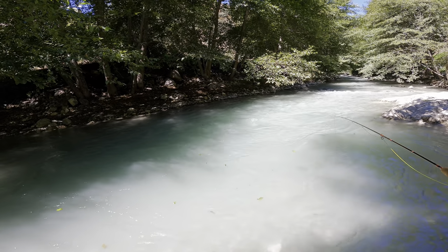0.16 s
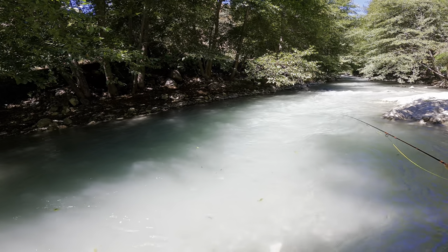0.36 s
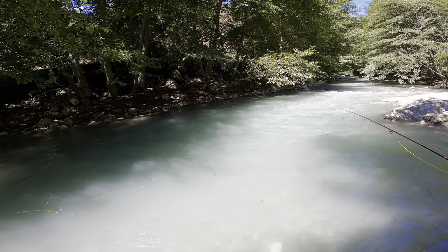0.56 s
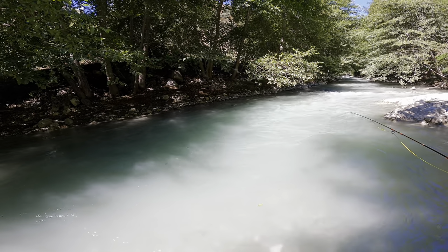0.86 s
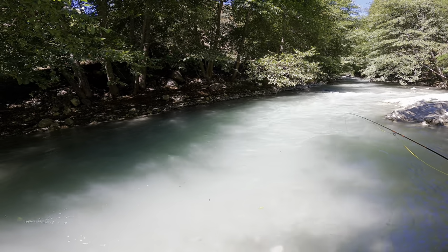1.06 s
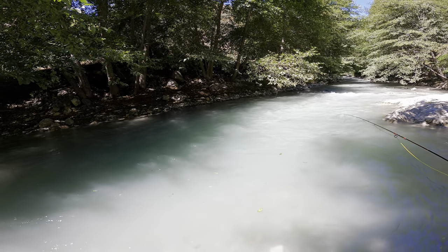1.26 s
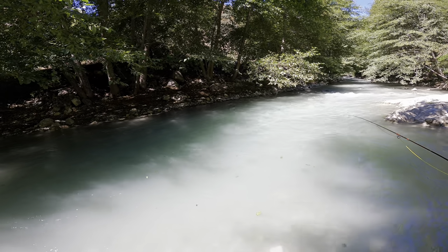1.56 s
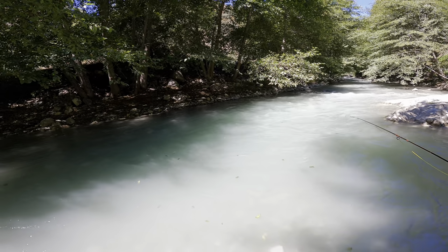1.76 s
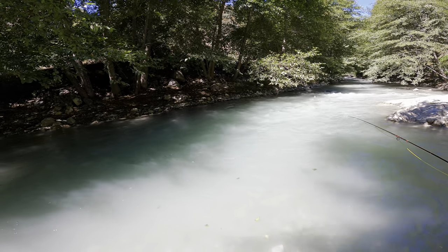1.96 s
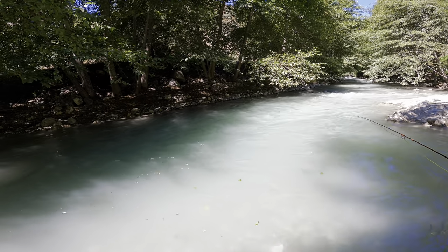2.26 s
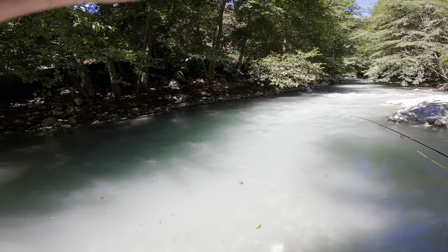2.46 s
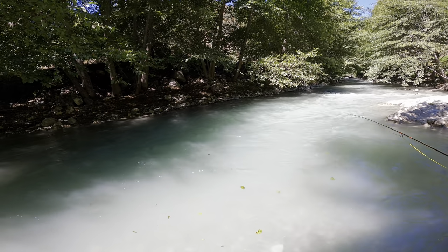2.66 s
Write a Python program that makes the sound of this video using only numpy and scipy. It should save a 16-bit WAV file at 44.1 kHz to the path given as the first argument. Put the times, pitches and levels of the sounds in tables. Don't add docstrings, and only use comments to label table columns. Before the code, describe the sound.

A fast river roars steadily past its bank, fine spray hissing above, while low bubbles gulp and glug close to a small outdoor microphone touched by faint wind rumble.

```python
import sys
import numpy as np
from scipy import signal
from scipy.fft import rfft, irfft, next_fast_len
from scipy.io import wavfile
from scipy.ndimage import uniform_filter1d, map_coordinates

SR = 44100
rng = np.random.default_rng(int(sys.argv[2]) if len(sys.argv) > 2 else 0)


def nominal_scale(level):
    x = np.asarray(level, float) / 20
    return 10 ** x


def int16_out(signal):
    q = np.round(np.clip(np.atleast_2d(signal).T, -1, 1) * 32767)
    wavfile.write(sys.argv[1], SR, q.astype(np.int16))


N = 123479
NOW = np.arange(N) / SR


def unit(x):
    return x / np.sqrt(np.mean(x ** 2) + 1e-20)


def filtered(x, response):
    m = next_fast_len(N + 8192)
    hz = np.fft.rfftfreq(m, 1 / SR)
    return irfft(rfft(x, m) * response(hz), m)[:N]


def rush(spectrum, patchy_db, span):
    f, db = np.transpose(spectrum)
    z = signal.stft(rng.standard_normal(N + 512), nperseg=512)[2]
    patches = uniform_filter1d(rng.standard_normal(z.shape), size=span, axis=0)
    patches = uniform_filter1d(patches, size=12, axis=1)
    noise = signal.istft(z * nominal_scale(patchy_db * unit(patches)), nperseg=512)[1][:N]
    return unit(filtered(noise, lambda hz: nominal_scale(np.interp(np.log(hz + 1), np.log(f + 1), db))))


RISE = 0.048


def bubbles(s, hz, db, cycles, size):
    t = np.arange(size) / SR
    life = t * hz[:, None] / cycles
    swell = np.e * 3 * life * np.exp(-3 * life)
    tone = np.sin(2 * np.pi * cycles * life * (1 + RISE * life / 2))
    wave = nominal_scale(db)[:, None] * swell * tone
    wave = wave * np.clip(4 - 4 * t / t[-1], 0, 1)
    at = np.round(s * SR).astype(int)[:, None] + np.arange(size)
    at = np.where((at < 0) | (at > N), N, at)
    return np.bincount(at.ravel(), wave.ravel(), N + 1)[:N]


def swarm(per_s, centre_hz, spread, cycles, sizes_db, size):
    count = round(per_s * N / SR)
    r = rng.random((count, 2))
    hz = np.clip(centre_hz * np.exp(spread * rng.standard_normal(count)), 60, SR / 3)
    db = -sizes_db * np.log(1 - r[:, 1])
    return unit(bubbles(r[:, 0] * N / SR, hz, db, cycles, size=size))


# f/Hz, level/dB (per Hz)
ROAR_COLOUR = [(25, -54), (70, -36), (130, -5.5), (190, 1.5), (330, 0.5), (520, -1.5), (620, -7),
               (850, -7.5)]
# f/Hz, level/dB (per Hz)
CHURN_COLOUR = [(500, -25), (850, 3), (1100, -7.5), (1600, -2), (2200, -15.5), (3200, -55)]


def roar(bright_db):
    crowd = swarm(1500, centre_hz=419.9, spread=0.4354, cycles=7.64, sizes_db=0.88, size=1100)
    water = rush(ROAR_COLOUR, patchy_db=-0.1, span=3) + nominal_scale(-11) * crowd
    end_hz, pivot_hz = 1049, 402
    water = unit(filtered(water, lambda hz: 1 / np.sqrt(1 + (hz / end_hz) ** 8)))
    upper = filtered(water, lambda hz: 1 / (1 + (pivot_hz / (hz + 1)) ** 8))
    lower = water - upper
    water = nominal_scale(bright_db / 2) * upper + nominal_scale(-bright_db / 2) * lower
    return water + nominal_scale(-13) * rush(CHURN_COLOUR, patchy_db=.5, span=5)


# f/Hz, level/dB (per Hz)
SPRAY_COLOUR = [(900, -16), (2000, -6.5), (3800, -11), (5600, -16), (7300, -20.5), (11600, -37),
                (13900, -47), (15700, -49)]


def spray():
    drops = swarm(2500, centre_hz=4140, spread=0.414, cycles=1.15, sizes_db=1.4, size=200)
    air_hz = 6450
    drops = filtered(drops, lambda hz: 1 / (1 + (hz / air_hz) ** 8))
    return unit(rush(SPRAY_COLOUR, patchy_db=0.12, span=9) + nominal_scale(-15) * drops)


# t/s, roar level/dB, roar brightness/dB, spray level/dB (over its mean)
RIVER_FLOW = [(0, -32, 2.5, -0.5), (.2, -32.5, 3, 0.5), (.45, -32.5, 4, 0), (.54, -32, 0, 0),
              (.7, -33.5, 6.5, 0.5), (.95, -32, 2, 0), (1.07, -31.5, 0.5, 0), (1.19, -32.5, 1.5, -0.5),
              (1.27, -32.5, 4, 0), (1.4, -32, 2, 0.5), (1.7, -32, 2, 0), (1.85, -32, -0.5, 0),
              (2.02, -31.5, 3, 0), (2.2, -32.5, 1.5, -0.5), (2.36, -33, 5, -0.5), (2.47, -32.5, 4.5, -0.5),
              (2.68, -31.5, 2.5, -0.5), (2.8, -34, 6.5, 0)]


def river():
    s, *controls = np.transpose(RIVER_FLOW)
    roar_db, bright_db, spray_db = [np.interp(NOW, s, c) for c in controls]
    spray_mean_db = -46
    return nominal_scale(roar_db) * roar(bright_db) + nominal_scale(spray_mean_db + spray_db) * spray()


def ringing(rows, life_s, db_over, size):
    s, db, hz = np.transpose(rows)
    cycles = (hz * life_s)[:, None]
    return bubbles(s - life_s / 3, hz / (1 + RISE / 3), db + db_over, cycles, size=size)


# t/s (of the peak), level/dB, f/Hz
GULP_BUBBLES = [(0.186, -34, 218), (0.192, -34, 709), (0.292, -37, 810), (0.45, -36, 796),
                (0.479, -35, 748), (0.508, -33, 280), (0.531, -31, 296), (0.551, -32.0, 359),
                (0.566, -33, 243.4), (0.607, -35.5, 734), (0.663, -31.0, 392), (0.675, -31.8, 508),
                (0.726, -31.5, 198), (0.833, -31.9, 316), (0.834, -30, 218), (1.051, -29, 377),
                (1.072, -29.5, 201), (1.106, -33, 767), (1.125, -32, 827), (1.26, -28.5, 398),
                (1.283, -32, 182), (1.358, -32, 172), (1.418, -35, 200), (1.563, -37.0, 694),
                (1.576, -33.5, 469), (1.607, -29, 376), (1.644, -36, 700), (1.672, -29.5, 498),
                (1.691, -33, 375), (1.715, -34, 193), (1.737, -32, 373), (1.797, -33.5, 208),
                (1.865, -33.5, 479), (2.033, -31, 558), (2.051, -36, 678), (2.113, -39, 746),
                (2.223, -30, 332), (2.283, -31.7, 319), (2.374, -31, 258), (2.432, -37.5, 177),
                (2.474, -29, 509.5), (2.506, -30.2, 502), (2.599, -31, 550), (2.66, -29, 541),
                (2.788, -32, 544)]


def gulps():
    return ringing(GULP_BUBBLES, life_s=0.03396, db_over=-1.5, size=4000)


# t/s (of the peak), level/dB, f/Hz
RIPPLE_BUBBLES = [(0.367, -46, 2035), (0.432, -45.5, 2207), (0.441, -43, 1852), (0.692, -49, 2143),
                  (0.711, -48.1, 2471), (0.739, -44, 1545), (0.981, -42.5, 1206), (1.447, -40, 1459),
                  (1.501, -41, 1098), (1.608, -41.1, 1254), (1.705, -41, 1459), (1.717, -42, 1319),
                  (1.72, -46, 1550), (2.0, -44, 1464), (2.016, -44, 2089), (2.029, -42, 1168),
                  (2.596, -47.1, 2083), (2.762, -51, 2369), (2.762, -44, 1960), (2.766, -42, 1147)]


def ripples():
    return ringing(RIPPLE_BUBBLES, life_s=.014, db_over=0, size=1800)


# t/s, peak level/dB, f/Hz
GLUG_BUBBLES = [
    (0, -24, 600),
    (.526, -19.5, 812),
    (1.12, -33, 800),
]


def glugs():
    s, db, hz = np.transpose(GLUG_BUBBLES)
    return bubbles(s - .002, hz, db - 2.5, cycles=9, size=1500)


# t/s, length/s, f/Hz (of the bubbles), level/dB
FOLDING_WAVES = [(0.13, .06, 352, -42.5), (1.66, .14, 416, -45), (2.47, .08, 500, -41),
                 (2.3, 0.098, 520, -40.5), (1.55, 0.0812, 139, -45.5), (1.7, 0.073, 141, -47),
                 (0.43, .06, 403, -41), (.66, .04, 390, -43.5), (1.3, 0.058, 368, -42),
                 (.97, 0.046, 269, -44.5), (2.78, 0.0397, 167, -45.5), (1.17, .05, 110, -51.5)]


def surges():
    s, length, hz, db = np.repeat(np.transpose(FOLDING_WAVES), repeats=12, axis=1)
    g = rng.standard_normal((len(s), 3))
    cycles = 8.2
    start = s + length / 2 * g[:, 0] - cycles / hz / 3
    return bubbles(start, hz * np.exp(0.1 * g[:, 1]), db + 2 * g[:, 2], cycles, size=3000)


# t/s, level/dB
BREEZE_LEVEL = [(0, -48.5), (.3, -61), (.55, -52), (.63, -78), (.9, -74), (1.1, -48), (1.4, -65),
                (1.6, -58), (1.9, -61), (2.1, -59), (2.4, -50.5), (2.8, -53.5)]
# f/Hz, level/dB (per Hz)
BREEZE_COLOUR = [(15, -30), (35, -30), (70, 6), (110, 5.5), (170, -34), (300, -70)]


def breeze():
    s, db = np.transpose(BREEZE_LEVEL)
    lumps_per_s = 11
    lumps = map_coordinates(rng.standard_normal(100), [NOW * lumps_per_s])
    rumble = unit(nominal_scale(-1.5 * lumps) * rush(BREEZE_COLOUR, patchy_db=3, span=2))
    return nominal_scale(np.interp(NOW, s, db)) * rumble


# t/s, peak level/dB, f/Hz
AIR_PUFFS = [(.48, -48, 62), (0.544, -46, 100), (1.06, -49, 65), (1.25, -60, 60), (1.53, -44, 62),
             (1.76, -54, 55), (2.08, -42, 75.6), (2.24, -51, 60), (2.34, -53, 50), (2.48, -47, 24),
             (2.622, -40.5, 66), (2.73, -53, 45)]


def puffs():
    s, db, hz = np.transpose(AIR_PUFFS)
    turns = (NOW - s[:, None]) * hz[:, None]
    swell = np.exp(-(turns / .75) ** 2)
    return np.sum(nominal_scale(db)[:, None] * swell * np.sin(2 * np.pi * turns), axis=0)


def scene():
    near = gulps() + ripples() + glugs() + surges()
    return (river() + near + breeze() + puffs())[None]


def band_limit(x):
    return signal.sosfilt(signal.butter(12, 15730, fs=SR, output="sos"), x)


def record(dry):
    port_hz, width_hz, port_db = 12750, 750, 6
    mix = filtered(dry[0], lambda hz: nominal_scale(port_db * np.exp(-((hz - port_hz) / width_hz) ** 2)))
    return band_limit(mix[None])


dry = scene()
out = record(dry)
int16_out(out)
```